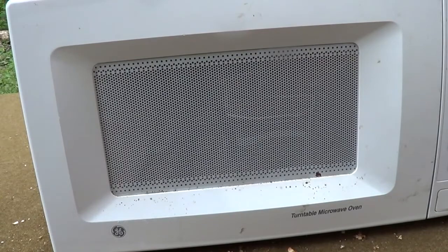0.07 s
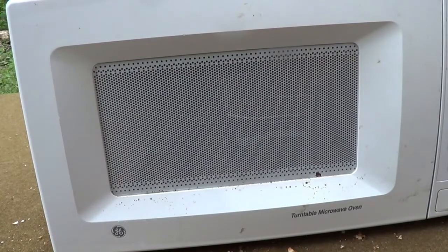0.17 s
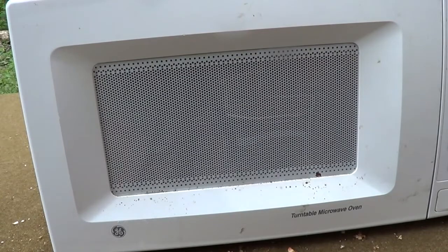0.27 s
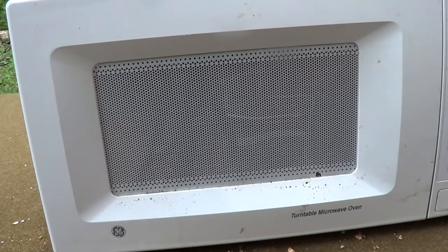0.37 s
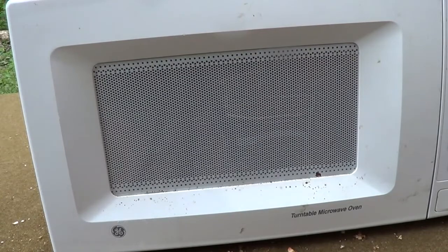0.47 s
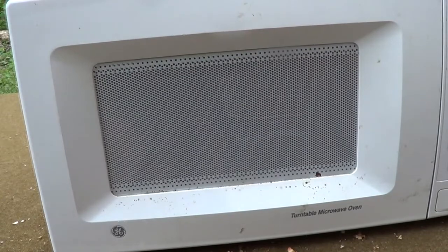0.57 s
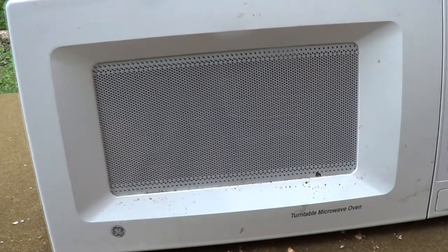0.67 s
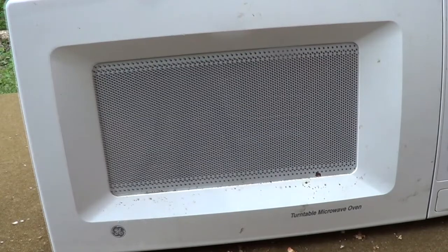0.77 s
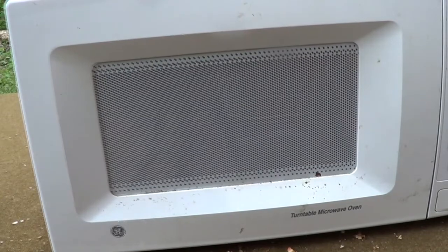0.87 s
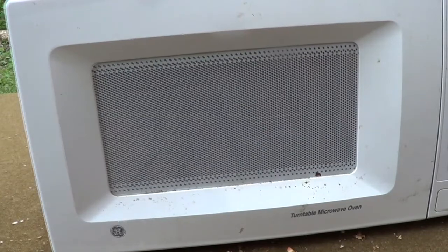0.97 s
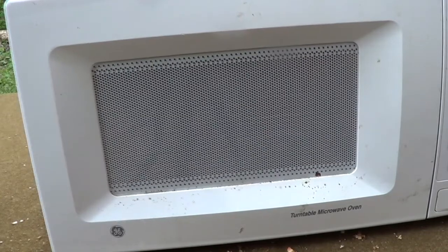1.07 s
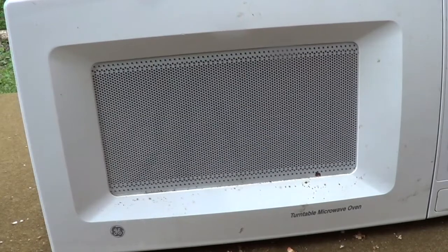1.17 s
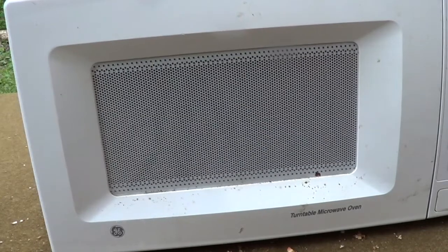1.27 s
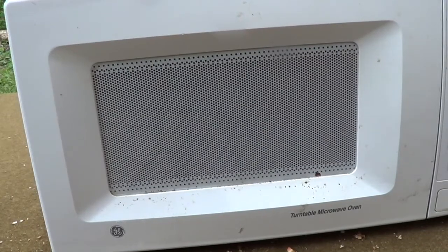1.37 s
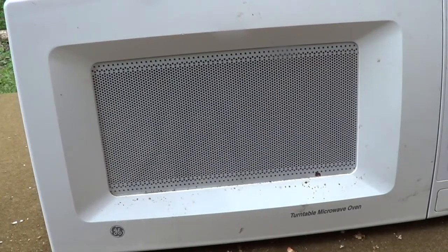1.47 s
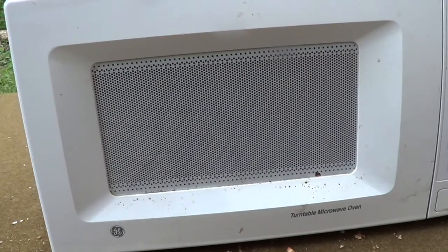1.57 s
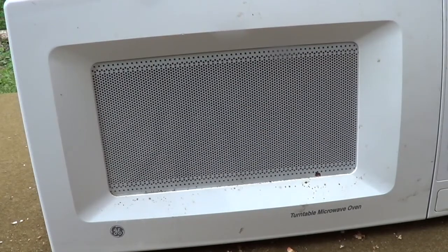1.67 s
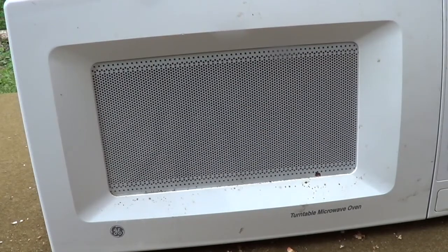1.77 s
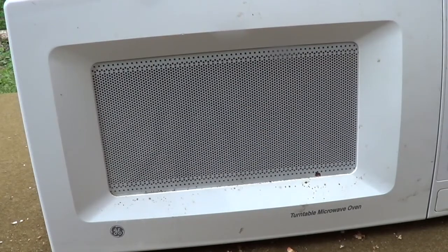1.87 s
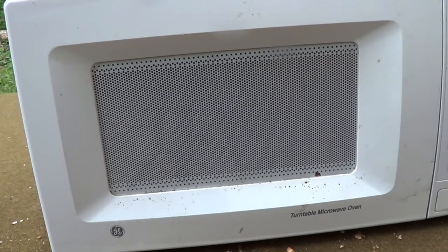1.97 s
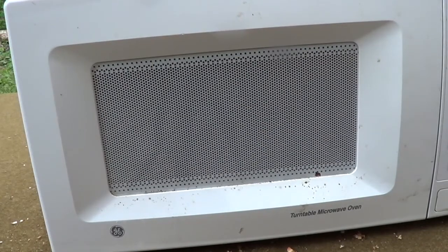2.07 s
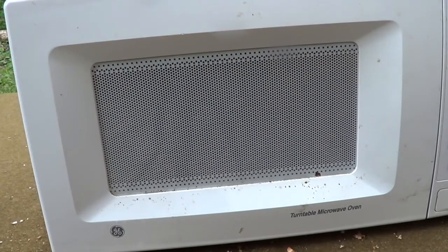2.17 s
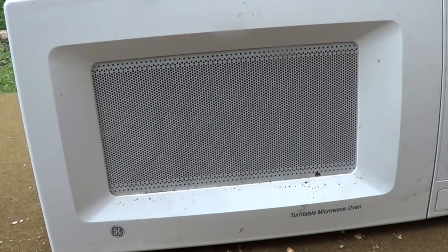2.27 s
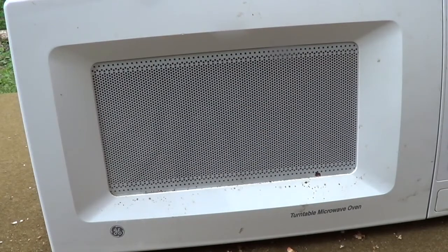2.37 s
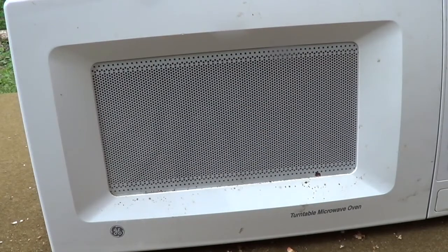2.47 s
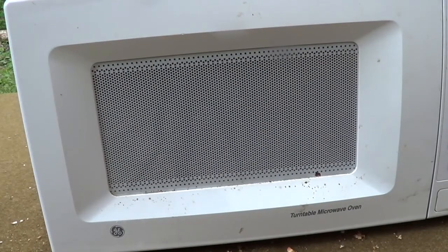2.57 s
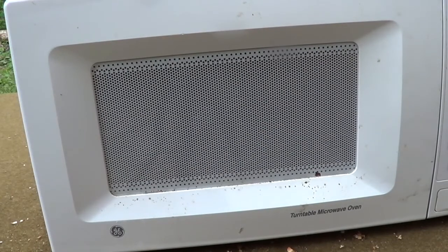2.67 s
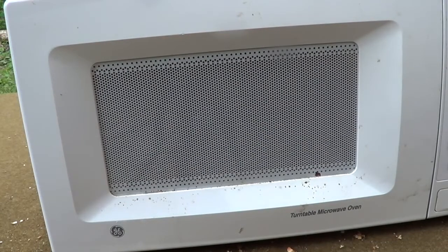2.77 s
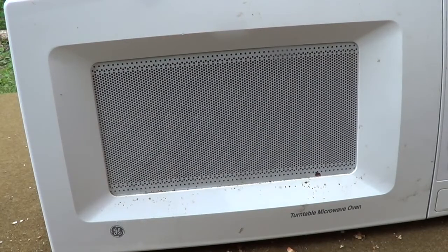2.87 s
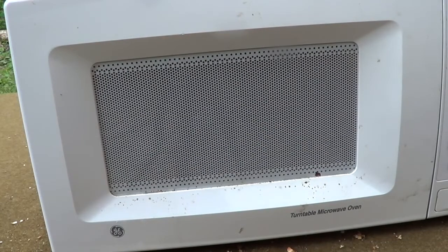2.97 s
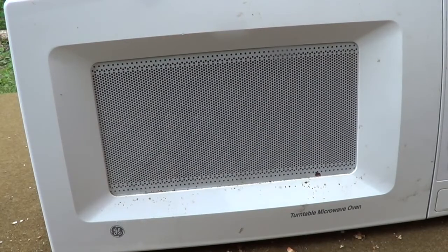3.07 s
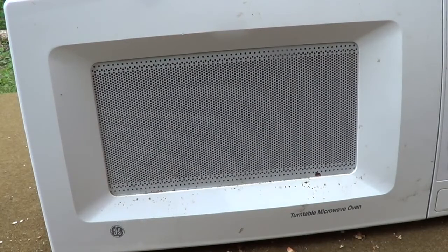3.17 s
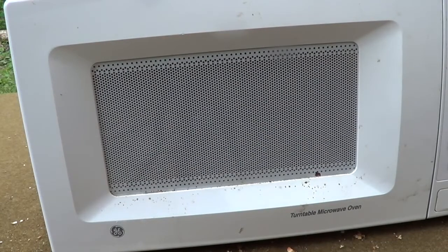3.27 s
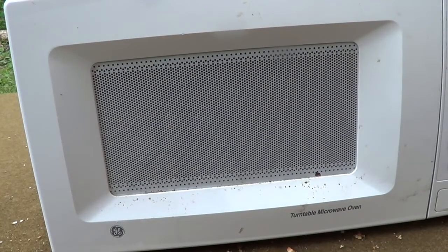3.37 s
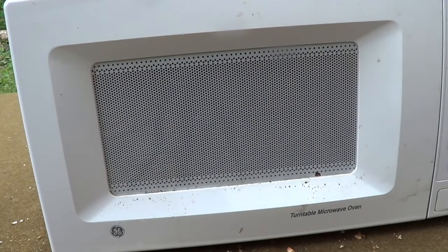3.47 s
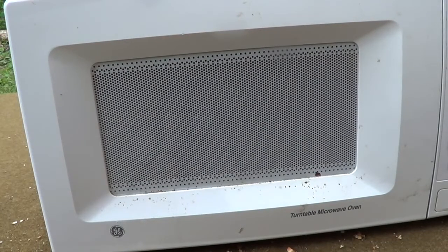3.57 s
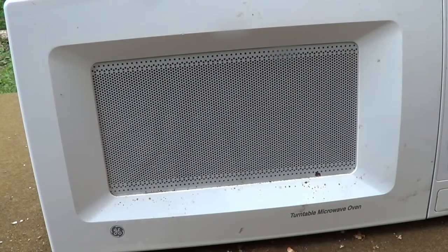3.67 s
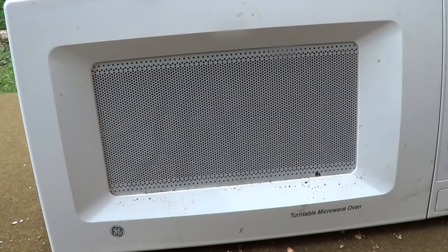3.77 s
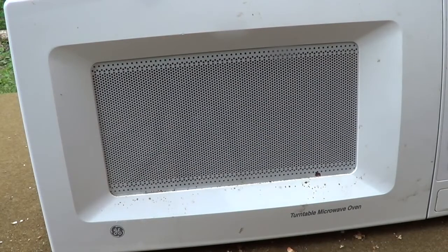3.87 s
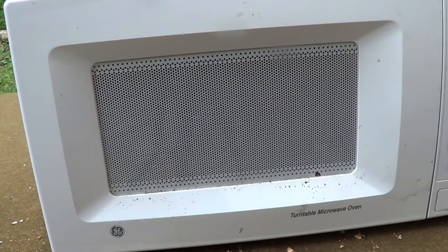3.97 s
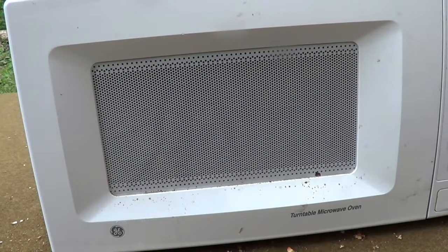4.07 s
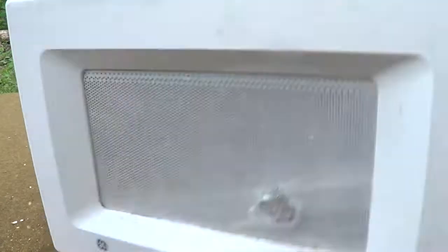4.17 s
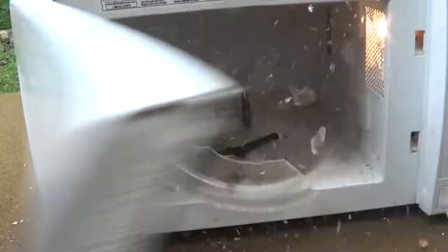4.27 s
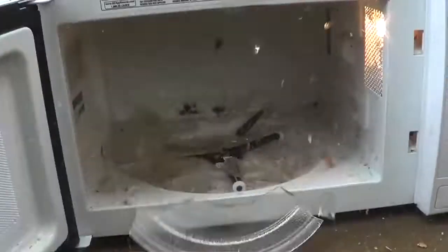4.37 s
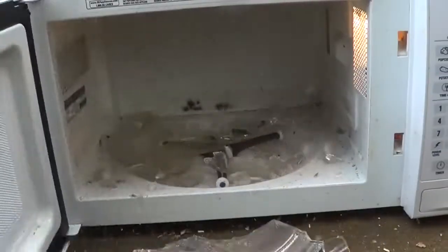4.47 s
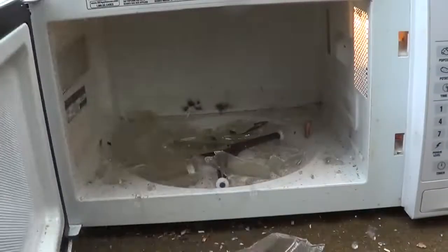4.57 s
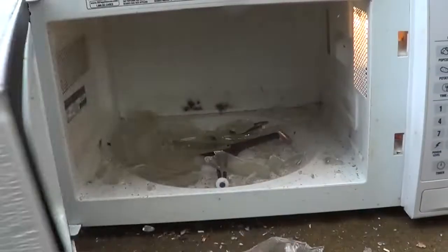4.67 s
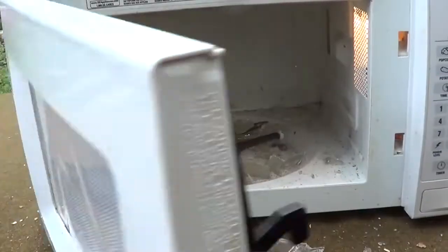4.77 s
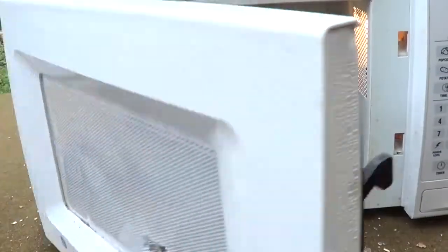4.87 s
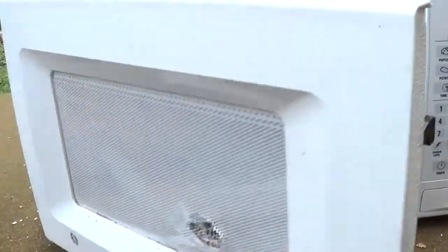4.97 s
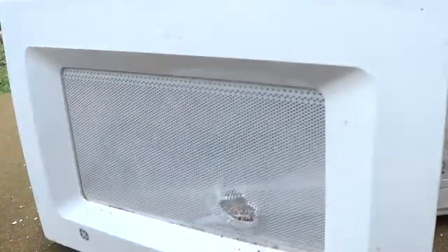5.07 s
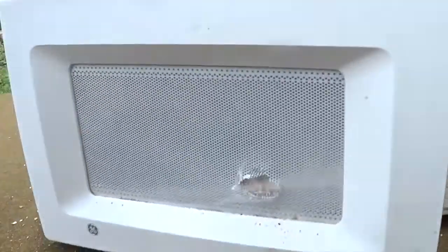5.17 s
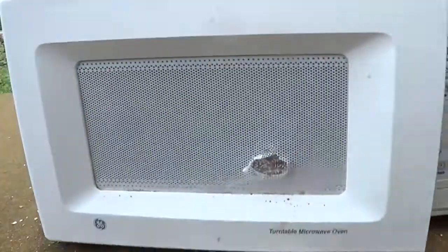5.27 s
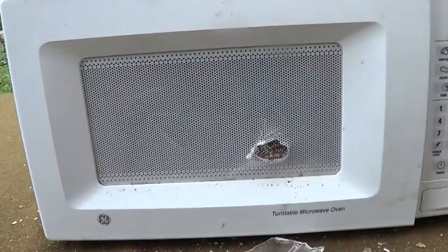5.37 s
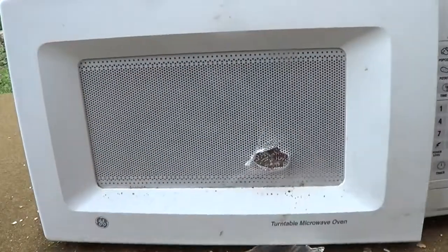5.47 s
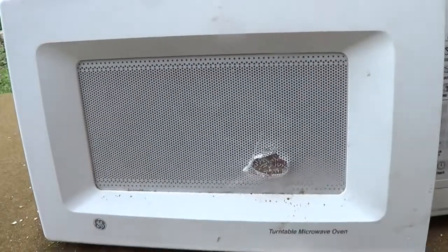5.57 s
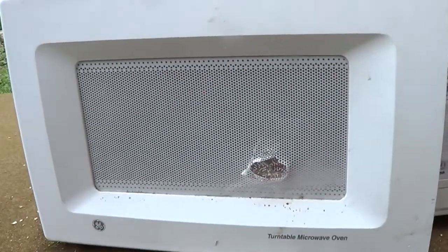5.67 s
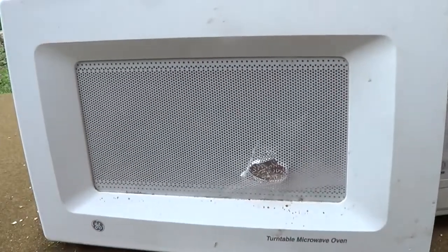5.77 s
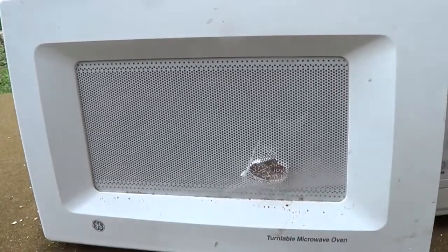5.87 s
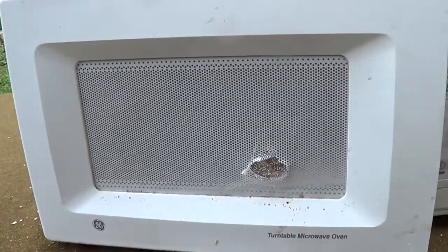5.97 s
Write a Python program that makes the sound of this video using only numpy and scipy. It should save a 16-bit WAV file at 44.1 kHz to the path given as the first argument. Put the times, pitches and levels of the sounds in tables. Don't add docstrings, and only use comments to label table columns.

```python
import sys
import numpy as np
from scipy import signal
from scipy.fft import rfft, irfft, next_fast_len
from scipy.io import wavfile
from scipy.ndimage import uniform_filter1d, map_coordinates

SR = 44100
rng = np.random.default_rng(int(sys.argv[2]) if len(sys.argv) > 2 else 0)


def store_pcm(level_fs):
    pcm = np.round(np.clip(level_fs, -1, 1) * 32767).astype(np.int16)
    wavfile.write(sys.argv[1], SR, np.atleast_2d(pcm).T)


def how_loud(loudness_db):
    steps = np.asarray(loudness_db, float) / 20
    return 10 ** steps


N = 265702
T = np.arange(N) / SR
CUT_S = 4.236


def unit(x):
    return x / np.sqrt(np.mean(x ** 2) + 1e-20)


def along(points, hz):
    f, v = np.transpose(points)
    return np.interp(np.log(hz + 1), np.log(f + 1), v)


def curves(rows):
    s, *cols = np.transpose(rows)
    return [np.interp(T, s, c) for c in cols]


def wobble(rate_hz):
    coarse = T[::8]
    knots = rng.standard_normal(int(N * rate_hz / SR) + 4)
    return np.interp(T, coarse, map_coordinates(knots, [coarse * rate_hz]))


def filtered(x, response):
    n = x.shape[-1]
    m = next_fast_len(n + 8192)
    return irfft(rfft(x, m) * response(np.fft.rfftfreq(m, 1 / SR)), m)[..., :n]


def modes(table):
    def response(f):
        total = 0
        for k, (c, w, db) in enumerate(table):
            total = total + (-1) ** k * how_loud(db) * 1j * f * w / (c * c - f * f + 1j * f * w)
        return total
    return response


def noise(spectrum, grain_db=0):
    white = rng.standard_normal(N) * how_loud(grain_db * wobble(1500))
    return unit(filtered(white, lambda hz: how_loud(along(spectrum, hz))))


def ring(rows, attack_s, longest_s):
    out, t = np.zeros(N + SR), np.arange(round(longest_s * SR)) / SR
    for s, hz, db, t60 in rows:
        tone = np.sin(2 * np.pi * hz * t)
        out[round(s * SR):][:len(t)] += how_loud(db - 60 * t / t60) * (1 - np.exp(-t / attack_s)) * tone
    return out[:N]


def scatter(x, t60_s):
    t = np.arange(SR // 8) / SR
    tail = rng.standard_normal(len(t)) * how_loud(-60 * t / t60_s)
    return signal.fftconvolve(x, tail / np.linalg.norm(tail))[:N]


# f/Hz, lead/rad
PORT_LEAD = [(90, -0.57), (600, -0.76), (1600, -0.49), (3000, -0.57), (5000, -0.1)]
# f/Hz, likeness/1
NEAR_LIKENESS = [(300, 1), (600, 0.72), (2000, 0.85), (3000, 1), (4500, 1), (8000, 0.97), (10500, 1)]
# f/Hz, likeness/1
FAR_LIKENESS = [(90, .95), (800, .75), (3000, .2), (4500, .25), (6000, .55), (8500, .93)]


def ports(direct, scattered, likeness):
    m = next_fast_len(N + 8192)
    hz, sign = np.fft.rfftfreq(m, 1 / SR), np.array([[1], [-1]])
    turn = np.arccos(np.clip(along(likeness, hz), 0, 1)) / 2
    pair = rfft(direct, m) * np.cos(turn) + sign * rfft(scattered, m) * np.sin(turn)
    return irfft(pair * np.exp(.5j * sign * along(PORT_LEAD, hz)), m)[:, :N]


DISSOLVE_S, DISSOLVE_LENGTH_S = 0.61, 0.73
FAR_HUM_DB, FAR_FAST_DB, FAR_AIR_DB, FAN_SAG_DB_PER_S = -6, -42.5, -3, 0.5
HUM_DIES_DB_PER_S, COAST_DB_PER_S, COAST_S = 801.5, 26.5, 0.74
FAN_DROP_DB, FAN_DROP_S = 23.5, .05
AIR_LAG_S, AIR_DROP_DB, AIR_DROP_S = .04, 24.5, .07


def running():
    near = np.clip((T - DISSOLVE_S) / DISSOLVE_LENGTH_S, 0, 1)
    off = np.clip(T - CUT_S, 0, COAST_S)
    air_off = np.clip(off - AIR_LAG_S, 0, None)

    def mix_db(far_db, share):
        return 20 * np.log10(how_loud(far_db) * (1 - share) + share)

    hum_db = mix_db(FAR_HUM_DB, near) + .6 - HUM_DIES_DB_PER_S * off
    slow_db = 20 * np.log10(1 - near + 1e-3) + 0.83 - HUM_DIES_DB_PER_S * off
    fast_db = mix_db(FAR_FAST_DB, near ** 0.8) - FAN_SAG_DB_PER_S * T
    fast_db = fast_db - FAN_DROP_DB * (1 - np.exp(-off / FAN_DROP_S)) - COAST_DB_PER_S * off
    air_db = mix_db(FAR_AIR_DB, near ** 3) - AIR_DROP_DB * (1 - np.exp(-air_off / AIR_DROP_S))
    return hum_db, slow_db, fast_db, air_db


def fan(blade_hz, blades, flutter_db):
    turn = 2 * np.pi * blade_hz * T + .3 * wobble(5)
    flutter = how_loud(flutter_db * wobble(20))
    out = np.zeros(N)
    for k, db in blades:
        out += how_loud(db) * np.roll(flutter, round(k * SR)) * np.sqrt(2) * np.sin(k * turn)
    return out


MAINS_HZ, SLOW_BLADE_HZ, FAST_BLADE_HZ = 59.99, 151, 167.8
# multiple of mains/1, level/dB
HUM_LINES = [(1, -68.5), (2, -39), (3, -43), (4, -42.5), (6, -32), (7, -58.5), (8, -50.5), (10, -79),
             (12, -52), (14, -60)]
# multiple of blade rate/1, level/dB
SLOW_BLADES = [(1, -5), (2, -9.5), (3, -9.5), (4, -8)]
# multiple of blade rate/1, level/dB
FAST_BLADES = [(1, 0.5), (1.25, -17), (2, -13.5), (3, -11.5), (4, -20.5), (6, -29)]
# f/Hz, width/Hz, level/dB
TUBE_WHINE = [(3067, 86, 0.5), (3420, 220, -7.5), (3950, 30, -0.5), (4800, 30, -4)]
# f/Hz, density/dB
AIR_RUSH = [(30, -32), (80, -20.5), (160, -7), (290, -12.5), (420, -12), (600, -14), (780, -11),
            (950, -16.5), (1300, -15.5), (1800, -18.5), (2400, -27.5), (4500, -34.5), (10000, -34),
            (16500, -61.5)]


def oven():
    hum_db, slow_db, fast_db, air_db = running()
    hum = np.zeros(N)
    for k, db in HUM_LINES:
        hum += how_loud(db) * np.sqrt(2) * np.sin(2 * np.pi * (k * MAINS_HZ * T + rng.random()))
    tones = how_loud(hum_db) * hum
    tones += how_loud(slow_db - 49) * fan(SLOW_BLADE_HZ, SLOW_BLADES, flutter_db=-3.5)
    tones += how_loud(fast_db - 33.5) * fan(FAST_BLADE_HZ, FAST_BLADES, flutter_db=1)

    def whine_band(f):
        return modes(TUBE_WHINE)(f) * (f / 3500) / (1 + (f / 3500) ** 2)

    whine = unit(filtered(rng.standard_normal(N), whine_band))
    tones += how_loud(fast_db - 61.5 + 2.4 * T + 1.21 * wobble(13)) * whine
    gusts = how_loud(air_db - 39.5 + 0.79 * wobble(12))
    air = ports(gusts * noise(AIR_RUSH, grain_db=2), gusts * noise(AIR_RUSH), NEAR_LIKENESS)
    return air + ports(tones, np.zeros(N), NEAR_LIKENESS) * how_loud([[.8], [-.8]])


def breeze():
    spectrum = [(15, -2), (30, 4), (70, -11.5), (120, -38.5), (200, -89)]  # f/Hz, density/dB
    return how_loud(-69.5) * np.array([how_loud(2.2 * wobble(3)) * noise(spectrum) for port in range(2)])


# t/s, duct rush/dB, hiss/dB
DYING_LEVELS = [
    (4.9, -54.5, -42),
    (5.226, -58.5, -75),
    (5.955, -71, -66.5),
    (5.97, -70, -56.5),
]
# f/Hz, density/dB
HISS_SPECTRUM = [(1000, 7.5), (3000, 13.5), (10500, 3), (13800, 8), (14600, -1.5), (15400, -9), (16000, -3)]
# f/Hz, density/dB
FIZZ_SPECTRUM = [(15450, -70), (15600, -14), (15740, 0), (15930, -60)]


def background_hiss():
    powered = T < CUT_S
    hiss = how_loud(np.where(powered, -57, curves(DYING_LEVELS)[1] - 6.5))
    fizz = how_loud(np.where(powered, -62, -75) + 1.5 * wobble(40)) * noise(FIZZ_SPECTRUM)
    return fizz + ports(hiss * noise(HISS_SPECTRUM), hiss * noise(HISS_SPECTRUM), FAR_LIKENESS)


FLICKERS, FLICKER_S, FLICKER_DB = 28, 0.0082, -50.5
# t/s, length/s, level/dB
ARC_BURSTS = [(0.08, 0.11, -52.5), (0.1, 0.04, -47), (0.293, 0.036, -52.5), (0.57, 0.013, -50.5),
              (0.783, 0.048, -50.5), (1.149, 0.0092, -52.5), (1.223, 0.062, -52), (1.31, 0.052, -52),
              (1.465, .014, -53), (1.563, 0.086, -55), (1.81, 0.075, -55), (2.047, 0.037, -55.5),
              (2.22, 0.012, -50.5), (2.372, 0.016, -49.5), (2.515, 0.033, -52.5), (2.665, 0.062, -57),
              (2.918, 0.019, -50.5), (3.004, 0.11, -54.5), (3.121, 0.076, -53), (3.233, 0.12, -51),
              (3.399, 0.11, -54), (3.517, .145, -52.5), (3.69, 0.19, -52.5), (3.945, 0.11, -52),
              (4.067, 0.087, -53)]
# f/Hz, density/dB
FAR_ARC = [(1200, -28.5), (2500, 0), (5000, -5), (9000, 0.5), (13000, -5), (15000, -11), (16500, -34.5)]
# f/Hz, density/dB
NEAR_ARC = [(1200, -28), (2500, 1), (5000, -8.5), (7000, -6.5), (9000, -2), (10500, -9.5), (13000, -22.5),
            (16500, -16)]
# f/Hz, width/Hz, level/dB
OVEN_CAVITY = [(6540, 200, -2), (6940, 220, -5), (8030, 200, -4), (8340, 290, 1), (9350, 310, -3.5),
               (9680, 300, -1.5)]


def arc():
    gate = np.zeros(N)
    u = rng.random((FLICKERS, 3))
    spits = np.c_[1.04 + 3.1 * u[:, 0], FLICKER_S * (1 + 2 * u[:, 1]), FLICKER_DB + 4 * (u[:, 2] - .5)]
    for s, length, db in [*spits, *ARC_BURSTS]:
        gate[round(s * SR):round((s + length) * SR)] = how_loud(db)
    simmer = how_loud(-66.5) * np.clip(T - 1.5, 0, 2) * (T < CUT_S)
    gate = np.abs(uniform_filter1d(gate + simmer, size=260))
    hiss = noise(NEAR_ARC, grain_db=4.5)
    near_view = T > 1
    rung = unit(0.73 * hiss + 1.8 * near_view * filtered(hiss, modes(OVEN_CAVITY)))
    return gate * how_loud(0.73 * wobble(55)) * np.where(near_view, rung, noise(FAR_ARC, grain_db=3))


POP_HZ, POP_T60_S, POP_KNOCK_DB = 9200, 0.1, -10
THUD_T60_S, DULL_RINGS = 0.061, 0.14
DEBRIS_T60_S, DEBRIS_T60_S_PER_DB = .056, .0009
DEBRIS_KNOCK_DB, DEBRIS_KNOCK_HZ = -15.5, 900
# t/s, peak/dB,
# brightest f/Hz, knock/dB, knock f/Hz
CABINET_THUDS = [(.771, -45, 1500, 6, 900), (4.2573, -2.5, 4320, -3, 1750), (4.2924, -7.5, 5600, 2, 653),
                 (4.8268, -12, 8750, -5.5, 1040), (5.4367, -19.5, 9920, 2.5, 668),
                 (5.463, -16.5, 9500, -11.5, 600), (5.4414, -8.5, 8700, -1, 1340),
                 (5.459, -11, 3420, -6.5, 546), (5.49, -43.5, 2720, 9, 600),
                 (5.5186, -34.5, 7500, 10.5, 625), (5.5493, -29.5, 8030, 0, 420),
                 (5.968, -48, 2200, -4.5, 1493), (5.99, -47.5, 2600, -14, 1300), (.325, -40, 2390, 5, 1710)]
# t/s, peak/dB, knock f/Hz
CARTRIDGES = [
    (4.127, -19.5, 430),
    (4.196, -22.5, 713),
    (4.2353, 3, 1700),
]
# t/s, peak/dB, brightest f/Hz
FALLING_DEBRIS = [(4.4591, -3, 4220), (4.796, -9, 8350), (4.8165, -20, 11000), (4.8427, -4.5, 8970),
                  (4.8887, -6.5, 9700), (4.9177, -14, 8800), (4.927, -18, 4000), (4.897, -12.5, 3500),
                  (4.9367, -10, 8300), (5.0255, -30, 8700), (5.2186, -35.5, 8030), (5.2734, -31.5, 6000),
                  (5.321, -42.5, 7290), (5.6373, -37, 8180), (5.784, -47.5, 7360), (5.958, -32, 2380),
                  (5.959, -39, 8960), (5.127, -29.5, 6500), (5.155, -39, 5000)]


def all_blows():
    rows = []
    for s, db, knock_hz in CARTRIDGES:
        rows.append((s, db, POP_HZ, POP_T60_S, POP_KNOCK_DB, knock_hz))
    for s, db, hz, knock_db, knock_hz in CABINET_THUDS:
        rows.append((s, db, hz, THUD_T60_S * (5000 / hz) ** DULL_RINGS, knock_db, knock_hz))
    for s, db, hz in FALLING_DEBRIS:
        t60 = DEBRIS_T60_S + DEBRIS_T60_S_PER_DB * db
        rows.append((s, db, hz, t60, DEBRIS_KNOCK_DB, DEBRIS_KNOCK_HZ))
    return rows


# f/Hz, width/Hz, level/dB
PANELS = [(226, 65, 3.5), (420, 64, 2.5), (760, 203, 2.5), (1110, 120, 1), (1286, 130, 0.5), (1666, 100, 2),
          (1885, 270, -3), (3230, 1600, -7.5)]


def blows():
    out, t = np.zeros(N + SR), np.arange(SR // 5) / SR
    for s, db, hz, t60, knock_db, knock_hz in all_blows():
        def crack_band(f):
            slope = (f / (f + 0.12 * hz)) ** 2 / (1 + (f / 12500) ** 4)
            return slope * (0.16 + modes([(hz, .4 * hz, 0)])(f))

        def panel(f):
            struck = modes(PANELS)(f) * (0.35 + modes([(knock_hz, .3 * knock_hz, 0)])(f))
            return struck + 0.44 * modes([(knock_hz, 60, 0)])(f)

        a, b = rng.standard_normal((2, len(t)))
        echo = how_loud(-20.5 - 15 * t / t60)
        decay = (how_loud(-60 * t / t60) + echo) * (1 - np.exp(-t / 0.00036))
        crack = unit(filtered(a, crack_band)) * how_loud(db - 10) * decay
        knock = filtered(b * how_loud(-60 * t / (2.3 * t60)), panel)
        out[round(s * SR):][:len(t)] += crack + how_loud(db + knock_db) * knock / np.abs(knock).max()
    return out[:N]


TICK_T60_S, TICK_NOISE = 0.003, 0.56
# t/s, peak/dB, f/Hz
CRUMB_TICKS = [(.7703, -24, 1100), (.801, -44.5, 7000), (4.972, -27, 12500), (5.001, -31.5, 9040),
               (5.044, -43.5, 13000), (5.063, -44.5, 8500), (5.066, -42.5, 11100), (5.08, -41, 10000),
               (5.092, -44.5, 14100), (5.104, -38.5, 12500), (5.109, -43, 10000), (5.121, -42.5, 13000),
               (5.128, -33, 8060), (5.16, -42, 12000), (5.175, -34.5, 13000), (5.184, -38, 9960),
               (5.188, -38, 8450), (5.196, -44, 8000), (5.208, -34.5, 14000), (5.225, -47, 10000),
               (5.241, -46, 8530), (5.335, -46, 11000), (5.352, -52, 9900), (5.376, -47.5, 12220),
               (5.587, -50, 10800), (5.621, -53.5, 9760), (5.65, -46, 8900), (5.654, -51, 13000),
               (5.668, -53.5, 9500), (5.69, -54.5, 11000), (5.77, -56, 14600), (5.78, -51, 11500),
               (5.795, -53, 12000), (5.836, -52, 8470), (5.896, -45, 13500), (5.92, -50.5, 9500),
               (5.926, -50.5, 11000), (5.9577, -27, 2430)]
# t/s, peak/dB, f/Hz
GLASS_SNAPS = [(4.2525, -8, 5000), (4.3655, -10.5, 8240), (4.394, -13.5, 5970), (4.46, -9.5, 5000),
               (4.817, -8.5, 9000)]


def ticks():
    out, t = np.zeros(N + SR), np.arange(SR // 100) / SR
    for s, db, hz in [*CRUMB_TICKS, *GLASS_SNAPS]:
        grit = np.diff(rng.standard_normal(len(t) + 1)) * min(hz / 10000, 1) ** 2
        click = np.sin(2 * np.pi * hz * t) + TICK_NOISE * grit
        out[round(s * SR):][:len(t)] += how_loud(db - 60 * t / TICK_T60_S) * click
    return out[:N]


HEAP_GAP_DB = -2
# t/s, length/s, level over the rain/dB
LANDING_HEAPS = [(4.335, 0.022, 1.5), (4.375, 0.027, -1), (4.44, 0.018, 3), (4.453, 0.026, 5.5),
                 (4.47, 0.03, 4.5), (4.518, 0.027, 1), (4.55, 0.016, 7), (4.595, .015, 4),
                 (4.615, .036, 8.5), (4.656, 0.024, 4), (4.688, 0.03, 0), (4.754, 0.018, 4.5),
                 (4.791, 0.015, 10.5)]


def heaps():
    db = np.where((T > 4.33) & (T < 4.82), HEAP_GAP_DB, 0.)
    for s, length, over_db in LANDING_HEAPS:
        db[round(s * SR):round((s + length) * SR)] = over_db
    return uniform_filter1d(db, size=130)


PIECE_TONES_HZ = [3040, 3940, 4220, 5450, 5700, 6600, 7340, 8270, 8700, 9500, 11500, 11600, 12500, 13500]


def clinks():
    u = rng.random((520, 5))
    piece = (u[:, 1] ** .8 * len(PIECE_TONES_HZ)).astype(int)
    pitch_hz = np.array(PIECE_TONES_HZ)[piece] * (1 + 0.3 * (u[:, 2] - .7) * (u[:, 2] > .4))
    rows = np.c_[4.26 + .84 * u[:, 0], pitch_hz, -22 * u[:, 3], .015 + .08 * u[:, 4] ** 2]
    return how_loud(8) * ring(rows, attack_s=0.00022, longest_s=.07) / np.sqrt(8)


CRACKLE_DB = 4
HEAP_BRIGHT = 0.6
# t/s, shards/dB, panel rattle/dB, boom/dB
SHATTER_LEVELS = [
    (4.236, -0.5, -31, -30),
    (4.274, -13.5, -2, -11),
    (4.33, -14.5, -8, -3.5),
    (4.42, -13.5, -13.5, -22.5),
    (4.752, -20, -13.5, -22),
    (4.86, -20.5, -13.5, -25.5),
    (4.98, -43, -3.5, -10.5),
    (5.24, -60, -2, -15),
]
# f/Hz, density/dB
SHARD_RAIN = [(1180, -26), (2000, -14), (7010, -6.5), (8510, -5), (10200, -9.5), (12000, -14.5),
              (15000, -13.5), (15600, -21), (16500, -77)]


def shatter():
    shards_db, rattle_db, boom_db = curves(SHATTER_LEVELS)
    live = (T > CUT_S) & (T < SHATTER_LEVELS[-1][0])
    heap_db = heaps()
    lumps = how_loud(2.8 * wobble(90) + HEAP_BRIGHT * heap_db)
    contacts = rng.standard_normal((2, N)) * how_loud(CRACKLE_DB * wobble(500) + 0.91 * wobble(45))
    panel = filtered(contacts, modes(PANELS))
    rattle = unit(filtered(panel[0], lambda f: 1 / (1 + (800 / (f + 1)) ** 6)))
    boom = unit(filtered(panel[1], lambda f: 1 / (1 + (f / 850) ** 6)))
    rain = how_loud(-7) * unit(lumps * noise(SHARD_RAIN, grain_db=CRACKLE_DB / 2))
    shaken = how_loud(0.85 * heap_db - 1.5) * (how_loud(rattle_db) * rattle + how_loud(boom_db) * boom)
    return live * how_loud(shards_db) * (rain + clinks() + shaken)


# t/s, f/Hz, level/dB, t60/s
CABINET_JOLTS = [(4.237, 50, -37.5, .06), (4.258, 70, -36, .06), (4.29, 70, -33, .1),
                 (4.335, 50, -39.5, .1), (4.46, 120, -30, 0.058), (4.548, 95, -37.5, .06),
                 (4.668, 110, -38, 0.089), (4.293, 218, -14.5, .1)]


def jolts():
    return ring(CABINET_JOLTS, attack_s=.004, longest_s=.1)


LIGHT_STRIKES, LIGHT_FROM_S, LIGHT_FOR_S, LIGHT_DB, LIGHT_RING_S = 28, 4.36, 0.27, -31, 0.01
# t/s, f/Hz, level/dB, ring/s
STRUCK_PIECES = [(4.331, 4980, -16, 0.011), (4.342, 5790, -17, 0.022), (4.348, 3960, -32.5, 0.039),
                 (4.352, 6500, -21.5, 0.008), (4.378, 5450, -26, 0.027), (4.407, 5460, -25, 0.034),
                 (4.416, 4170, -28.5, 0.039), (4.417, 7320, -20.5, 0.022), (4.423, 6540, -17.5, 0.053),
                 (4.467, 4210, -21.5, 0.01), (4.474, 5350, -18.5, 0.013), (4.478, 6820, -23, 0.008),
                 (4.481, 3970, -21, 0.026), (4.502, 5400, -22, 0.049), (4.516, 3040, -23, 0.021),
                 (4.52, 3950, -27.5, 0.01), (4.537, 4010, -22, 0.03), (4.54, 6490, -21.5, 0.0088),
                 (4.565, 4030, -29, 0.017), (4.583, 5450, -23.5, 0.024), (4.587, 6550, -18, 0.021),
                 (4.602, 3950, -25, 0.018), (4.653, 3980, -25.5, 0.009), (4.674, 4570, -26.5, 0.015),
                 (4.686, 3130, -25.5, 0.012), (4.697, 4020, -26, 0.018), (4.721, 3580, -25.5, 0.007),
                 (4.739, 7340, -19.5, 0.023), (4.74, 5400, -32.5, 0.05), (4.773, 6550, -28.5, 0.014),
                 (4.889, 5520, -20.5, 0.014),
                 (4.331, 9100, -23.5, 0.008), (4.342, 8200, -27.5, 0.018), (4.345, 9400, -20.5, 0.018),
               (4.356, 14750, -24.5, 0.015), (4.363, 8810, -14, 0.009), (4.364, 11390, -20.5, 0.01),
               (4.379, 11340, -20, 0.048), (4.38, 11600, -19, 0.038), (4.369, 8280, -17, 0.033),
               (4.411, 8270, -15, 0.018), (4.411, 9420, -21.5, 0.022), (4.415, 12560, -25.5, 0.016),
               (4.438, 8270, -23.5, 0.018), (4.481, 9750, -23, 0.015), (4.481, 13280, -27, 0.024),
               (4.496, 12330, -22, 0.035), (4.503, 8780, -13, 0.022), (4.515, 8270, -17.5, 0.018),
               (4.516, 11600, -25, 0.008), (4.526, 9400, -21, 0.025), (4.534, 8740, -21, 0.018),
               (4.561, 9500, -12.5, 0.021), (4.571, 14500, -28, 0.032), (4.58, 11850, -27, 0.012),
               (4.582, 8340, -18.5, 0.053), (4.586, 9390, -20.5, 0.018), (4.593, 11500, -24, 0.05),
               (4.614, 8820, -17, 0.015), (4.622, 12400, -26.5, 0.009), (4.667, 9400, -21.5, 0.0091),
               (4.672, 11800, -21.5, 0.0202), (4.684, 8780, -19, 0.089), (4.686, 13860, -19, 0.021),
               (4.696, 10220, -23, 0.029), (4.705, 13490, -21, 0.011), (4.738, 11600, -22, 0.029),
               (4.738, 11300, -21.5, 0.031), (4.739, 8270, -13.5, 0.052), (4.739, 9430, -20, 0.018),
               (4.74, 12500, -24, 0.013), (4.762, 9460, -24.5, 0.008), (4.771, 12540, -21, 0.013),
               (4.796, 9400, -25.5, 0.01), (4.812, 12700, -22, 0.0097), (4.847, 11930, -26, 0.011),
               (4.919, 8270, -23, 0.013), (4.921, 9470, -30.5, 0.02),
                 (4.325, 7700, -14.5, 0.0059), (4.34, 8260, -29.5, 0.099), (4.35, 6550, -29, 0.23),
                  (4.39, 8750, -19.5, .03), (4.44, 9400, -24.5, .04), (4.46, 8300, -25.5, .04),
                  (4.62, 5410, -29.5, 0.1), (4.55, 3990, -29.5, .08), (4.39, 823, -26, 0.023),
                  (4.751, 8840, -19.5, 0.047), (4.545, 8750, -24, .05), (4.63, 8750, -22, 0.031),
                  (4.635, 8250, -24.5, .03), (4.645, 9400, -21.5, .03), (4.66, 8720, -20, 0.019),
                  (4.729, 8800, -13.5, .008), (4.89, 9700, -28.5, 0.011), (4.892, 10300, -29.5, 0.011),
                  (4.92, 11400, -33, 0.013), (4.92, 15000, -36.5, 0.023), (4.935, 4950, -37.5, 0.021)]


def strikes():
    u = rng.random((LIGHT_STRIKES, 4))
    hz = np.resize(PIECE_TONES_HZ, len(u)) * (1 + .02 * (u[:, 3] - .5))
    ring_s = LIGHT_RING_S * (1 + 1.5 * u[:, 2])
    light = np.c_[LIGHT_FROM_S + LIGHT_FOR_S * u[:, 0], hz, LIGHT_DB - 9 * u[:, 1], ring_s]
    return [*STRUCK_PIECES, *light]


def ringing_pieces():
    out = np.zeros(N)
    chatter = how_loud(3 * wobble(220))
    slip = .45 * wobble(130)
    for s, hz, db, length in strikes():
        t = np.arange(round((1.2 * length + .04) * SR)) / SR
        collision = 60 * np.clip(t - 1.2 * length, 0, None) / 0.037
        damped = how_loud(db + 2.5 - 8 * t / length - collision) * (1 - np.exp(-t / 0.00064))
        own = round(hz) * 8
        tone = np.sin(2 * np.pi * hz * t + slip[own:][:len(t)])
        at = round(s * SR)
        out[at:at + len(t)] += chatter[own:][:len(t)] * damped * tone
    return out


# f/Hz, density/dB
YARD_RUSH = [(30, -40), (150, -30.5), (220, -35), (490, -25), (650, -15.5), (740, -8.5), (850, -19.5),
             (950, -25), (1350, -20.5), (2200, -29.5), (3500, -39.5)]


def coasting_fan():
    rush_db = curves(DYING_LEVELS)[0]
    rush = np.clip((T - 4.5) / 0.21, 0, 1) * how_loud(rush_db + 8.5 + 0.97 * wobble(34))
    return ports(rush * noise(YARD_RUSH), rush * noise(YARD_RUSH), FAR_LIKENESS)


# t/s, f/Hz, level/dB, t60/s
DOOR_TONES = [(4.828, 795, -43, 0.29), (4.842, 992, -11.5, 0.042), (4.889, 1058, -19.5, 0.071),
              (4.905, 860, -29, 0.16), (4.962, 1006, -26.5, 0.075), (5.1265, 1600, -34, 0.032),
              (5.127, 1890, -24.5, 0.023), (5.128, 1260, -27, 0.033), (5.439, 1375, -22.5, 0.073),
              (5.44, 618.6, -19.5, 0.19), (5.458, 597, -18, 0.092), (5.485, 150, -22, 0.11),
              (5.455, 343, -24.5, 0.11), (5.465, 179, -26.5, 0.11), (5.525, 631, -28.5, 0.1),
              (5.532, 178, -27, 0.25), (5.555, 137.5, -33, 0.23), (5.551, 8050, -41, 0.044),
              (5.54, 12600, -50, 0.037), (5.272, 5830, -45.5, 0.048), (5.273, 7700, -47, 0.1)]


def door():
    return ring(DOOR_TONES, attack_s=0.0016, longest_s=.4)


# t/s, level/dB, rise/s, hold/s, t60/s
DOOR_SHUDDERS = [
    (4.898, -60.5, 0.11, 0.138, 0.71),
    (5.5, -49, .05, 0.056, 0.82),
]
# f/Hz, width/Hz, level/dB
HINGE_MODES = [(141.3, 16, -1), (177.3, 26, -8), (240, 80, -9.5)]


def shudder():
    swing = np.zeros(N)
    for s, db, rise, hold, t60 in DOOR_SHUDDERS:
        decay = how_loud(db - 60 * np.clip(T - s - rise - hold, 0, None) / t60)
        swing += decay * np.clip((T - s) / rise, 0, 1) ** 2
    shaking = filtered(rng.standard_normal(N), lambda f: modes(HINGE_MODES)(f) / (1 + (f / 300) ** 4))
    return swing * how_loud(2.4 * wobble(22)) * unit(shaking)


def late_crumbs():
    u = rng.random((55, 3))
    level_db = -44 - 14 * u[:, 2] - 8 * u[:, 0]
    rows = np.c_[5 + .95 * u[:, 0] ** 2.5, 7000 + 8000 * u[:, 1], level_db, np.full(len(u), .003)]
    return ring(rows, attack_s=.00005, longest_s=.02)


BODY_FLOOR_HZ = 129


def scene():
    near = arc() + blows() + ticks() + shatter() + ringing_pieces() + door() + late_crumbs()
    near = filtered(near, lambda f: (1j * f / (BODY_FLOOR_HZ + 1j * f)) ** 2)
    smeared = scatter(near, t60_s=.07)
    thumps = jolts()
    close = ports(near + thumps, smeared + .6 * thumps, NEAR_LIKENESS)
    far = coasting_fan() + ports(shudder(), np.zeros(N), FAR_LIKENESS)
    return oven() + breeze() + background_hiss() + close + far


def roll_off(x):
    return signal.sosfilt(signal.butter(12, 16960, fs=SR, output="sos"), x)


TOP_HZ, GAIN_KNEE_DB, OVERLOAD = 15950, -16.5, 1.05


def record(dry):
    x = filtered(dry, lambda hz: np.where(hz < TOP_HZ, 1, how_loud(-36.5)))
    level = np.sqrt(np.abs(uniform_filter1d(np.mean(x ** 2, axis=0), size=220)))
    x = x / (1 + (level / how_loud(GAIN_KNEE_DB)) ** 4) ** (1 / 10)
    mix = x / (1 + np.abs(x / OVERLOAD) ** 4) ** (1 / 4)
    return roll_off(mix)


dry = scene()
out = record(dry)
store_pcm(out)
```